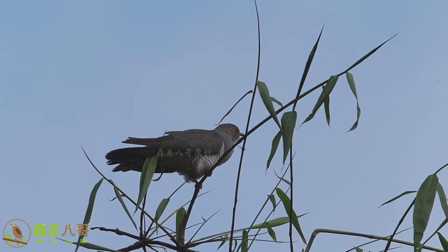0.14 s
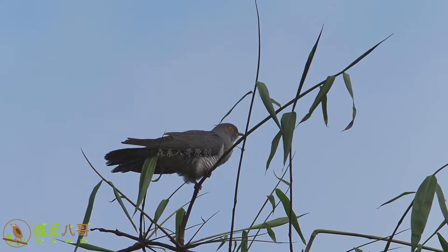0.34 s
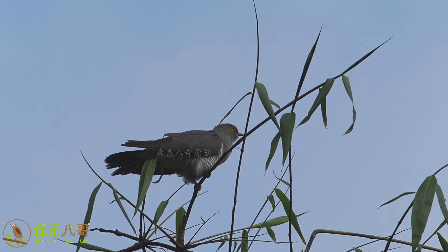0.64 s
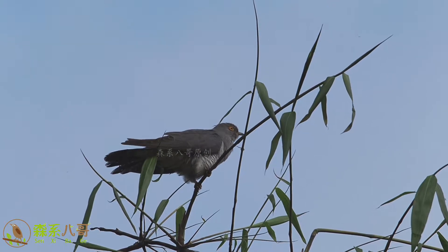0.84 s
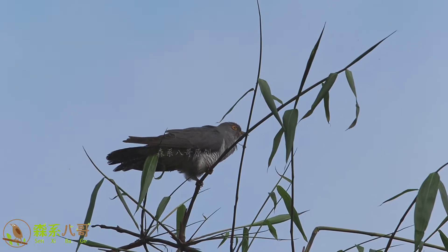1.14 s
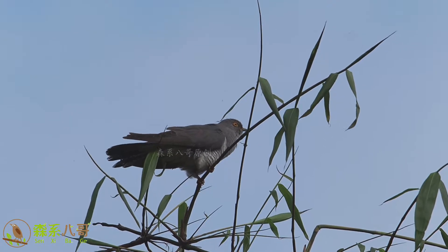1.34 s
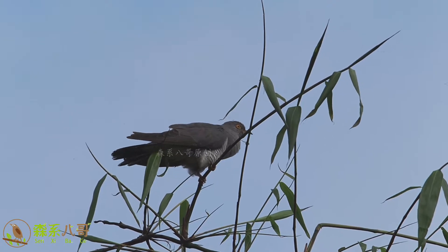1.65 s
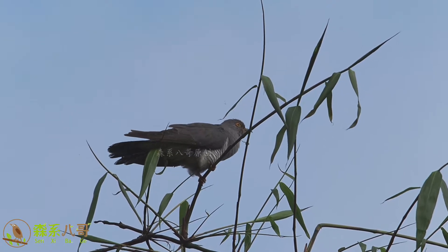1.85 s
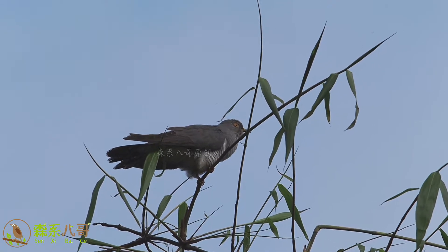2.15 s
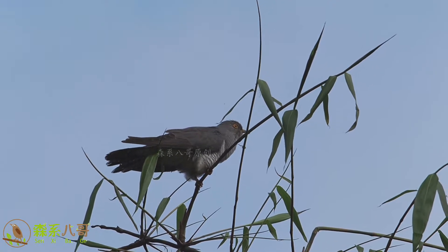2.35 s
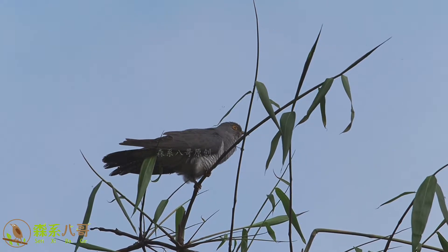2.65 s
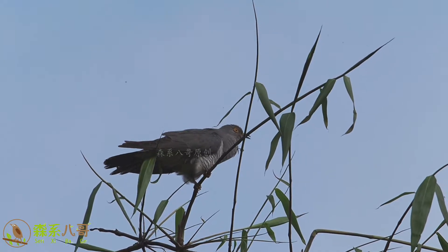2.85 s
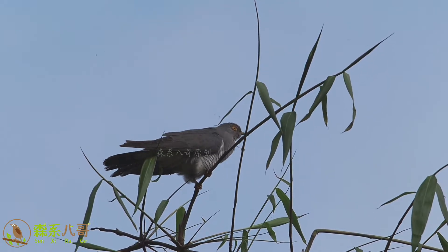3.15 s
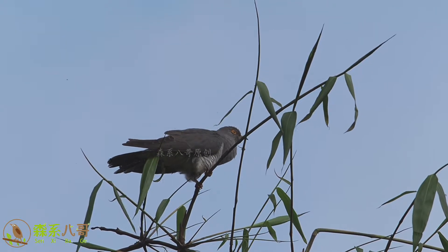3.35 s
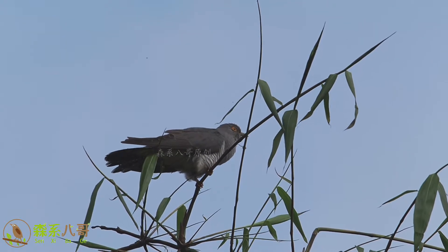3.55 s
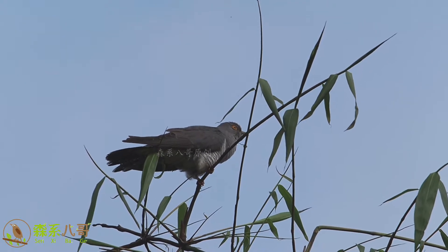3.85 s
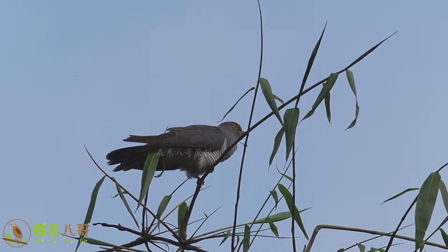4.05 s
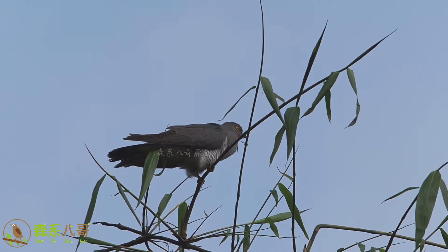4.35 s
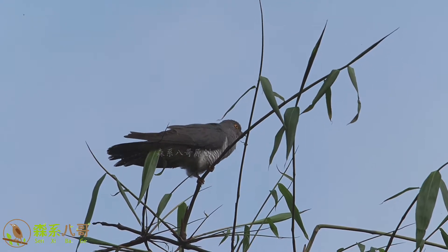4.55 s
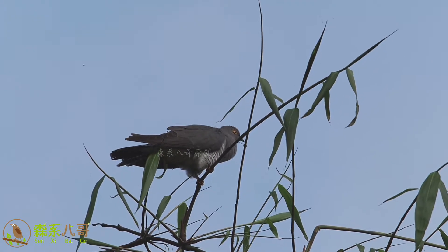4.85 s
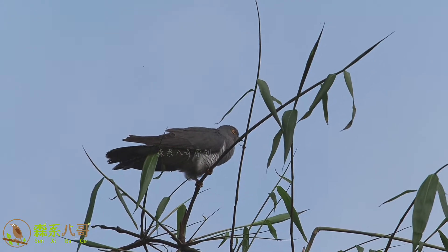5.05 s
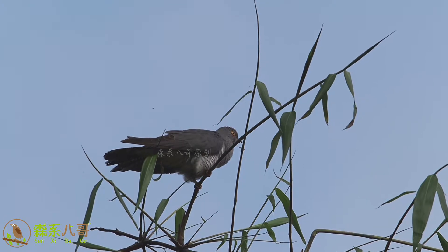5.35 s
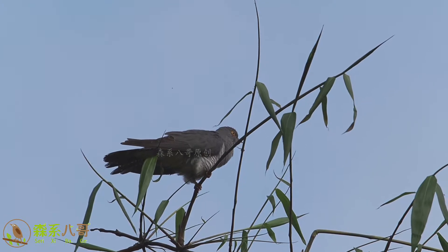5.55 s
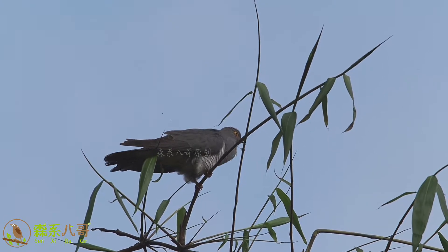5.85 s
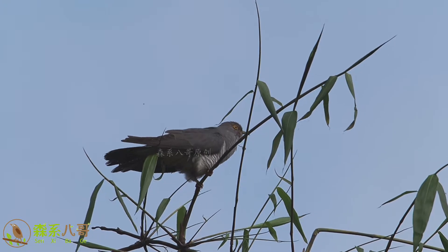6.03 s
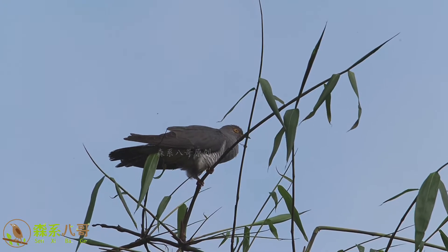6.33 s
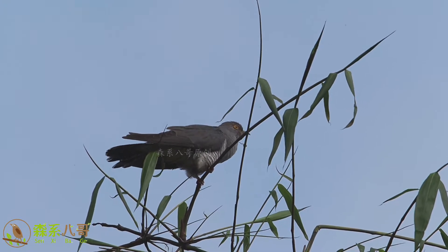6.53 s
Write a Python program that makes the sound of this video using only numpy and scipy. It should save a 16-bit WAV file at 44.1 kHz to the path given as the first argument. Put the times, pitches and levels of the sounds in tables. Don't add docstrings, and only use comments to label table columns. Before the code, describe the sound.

A cuckoo calls its mellow two-note song four times, echoing off trees, while small birds twitter, whistle and trill faintly over a soft outdoor hush.

```python
import sys
import numpy as np
from scipy import signal
from scipy.fft import rfft, irfft, next_fast_len
from scipy.io import wavfile

SR = 44100
rng = np.random.default_rng(int(sys.argv[2]) if len(sys.argv) > 2 else 0)


def to_wav(sig):
    pcm = np.clip(np.atleast_2d(sig), -1, 1) * 32767
    pcm = np.round(pcm).astype(np.int16)
    wavfile.write(sys.argv[1], SR, pcm.T)


def ratio_of_db(decibels):
    return 10 ** (np.asarray(decibels, float) / 20)


N = 295029
TIME = np.arange(N) / SR
CALL_TIME = np.arange(N + SR) / SR - 1


def at_hz(points, hz):
    points_hz, points_db = np.transpose(points)
    return np.interp(np.log(hz), np.log(points_hz), points_db)


def drift(rate_hz):
    return np.interp(TIME * rate_hz, np.arange(400), rng.standard_normal(400))


def gate(rows, edge_s):
    total = np.zeros(N)
    for row in rows:
        to_nearest_end = np.minimum(TIME - row[0], row[0] + row[1] - TIME)
        total += ratio_of_db(row[-1]) * np.clip(to_nearest_end / edge_s, 0, 1)
    return total


def correlated_pair(mid, side, alike):
    alike = np.clip(alike, -1, 1)
    return np.sqrt(1 + alike) * mid + np.sqrt(1 - alike) * side * [[1], [-1]]


def scatter(x, t60_s, wet_db, onset_s, alike):
    t = np.arange(3 * SR // 2) / SR
    mid, side = rng.standard_normal((2, len(t)))
    buildup = np.clip(t / onset_s, 0, 1) ** 2
    tail = correlated_pair(mid, side, alike) * ratio_of_db(-60 * t / t60_s) * buildup
    tail = tail / np.sqrt(np.mean(np.sum(tail ** 2, axis=1)))
    return ratio_of_db(wet_db) * signal.fftconvolve(x[None], tail, axes=1)[:, :len(x)]


def from_side(x, pan_db):
    return np.array([np.roll(x, 6) * ratio_of_db(pan_db / 2), x * ratio_of_db(-pan_db / 2)])


def glides(rows, early, rise, sharp, octave_db, waver_db):
    out = np.zeros(N)
    unsteady = ratio_of_db(waver_db * drift(25))
    wobble = 1 + 0.006 * drift(55)
    for start_s, length_s, from_hz, to_hz, level_db in rows:
        on = (TIME >= start_s) & (TIME < start_s + length_s)
        u = (TIME[on] - start_s) / length_s
        hz = from_hz + (to_hz - from_hz) * (u + (4 * early - 2) * u * (1 - u))
        phase = 2 * np.pi * np.cumsum(hz * wobble[on]) / SR
        swell = np.minimum(u / rise, (1 - u) / (1 - rise)) ** sharp
        tone = np.sin(phase) + ratio_of_db(octave_db) * swell * np.sin(2 * phase)
        out[on] += ratio_of_db(level_db + 8) * swell * tone
    return out * unsteady


def air_floor(patchy_db):
    # hz, level_db (per Hz)
    floor_spectrum = [(12, -23), (22, 4.5), (282, -9), (958, -8.5), (1270, -13.5), (2680, -20),
                      (8180, -24.5), (15500, -33.5)]
    # centre_hz, width_hz, level_db
    dips_and_insects = [(250, 24.5, 5), (351.4, 25, -10), (580, 62, -8), (3224, 294, 11), (6440, 570, -6)]
    # hz, likeness (-1 to 1)
    likeness = [(40, 0.69), (130, 0.3), (640, 0.45), (1400, .3), (3100, -0.33), (4500, -0.25),
                (7000, -0.16), (15000, 0.0087)]
    # hz, left_minus_right_db
    leaning = [(60, 1.3), (200, 2), (500, 0), (1290, -1), (2400, 1.5), (8000, 0.9), (15000, -2.5)]
    size = next_fast_len(N)
    hz = np.maximum(np.arange(size // 2 + 1) * SR / size, 1)
    mid, side = rfft(rng.standard_normal((2, size)))
    alike = np.clip(at_hz(likeness, hz), -1, 1)
    level_db = at_hz(floor_spectrum, hz) + at_hz(leaning, hz) * [[.5], [-.5]]
    for centre_hz, width_hz, band_db in dips_and_insects:
        level_db = level_db + band_db * np.exp(-((hz - centre_hz) / width_hz) ** 2)
    pair = correlated_pair(mid, side, alike) * ratio_of_db(level_db) / np.sqrt(1 + alike)
    octave = np.log2(hz / 16)
    together = drift(0.74)
    out = 0
    for centre in range(11):
        share = np.cos(np.pi / 2 * np.clip(octave - centre, -1, 1)) ** 2
        swell = ratio_of_db(patchy_db * (0.37 * together + drift(4)))
        out = out + swell * irfft(pair * share, size)[:, :N]
    return ratio_of_db(-55.5) * out / np.sqrt(np.mean(out.mean(axis=0) ** 2))


def flock(bouts, low_hz, high_hz, trim_db):
    out = np.zeros(N + 1000)
    u = np.arange(1000) / 1000
    for when, pitch, slide, loudness in rng.random((1000, 4)):
        hz = low_hz + (high_hz - low_hz) * pitch + 1500 * (slide - .6) * (u - .5)
        at = int(when * N)
        chirp = np.sin(np.pi * u) ** 2 * np.sin(2 * np.pi * np.cumsum(hz) / SR)
        out[at:at + 1000] += ratio_of_db(8 * loudness) * chirp
    return ratio_of_db(trim_db) * gate(bouts, edge_s=0.14) * out[:N] / out.std()


def far_flocks():
    # start_s, length_s, level_db
    low_bouts = [
        (-.1, 0.66, -62),
        (.6, 0.24, -63),
        (1.3, 1.3, -64),
        (2.7, 1.17, -63),
        (4.68, 0.35, -57.5),
        (0, 4, -65.5),
    ]
    # start_s, length_s, level_db
    high_bouts = [
        (0.2, 0.82, -60.5),
        (0.8, 0.35, -55.5),
        (1.8, .7, -64.5),
        (3.15, 0.66, -62),
        (0, 3.75, -61),
    ]
    low = flock(low_bouts, low_hz=3900, high_hz=5454, trim_db=-5.5)
    return low + flock(high_bouts, low_hz=5390, high_hz=7100, trim_db=-10)


def far_coos():
    # start_s, length_s, from_hz, to_hz, level_db
    coos = [(.005, 0.1, 2500, 2450, -69), (.58, 0.06, 2150, 2130, -70), (.7, .13, 1310, 1290, -71),
            (.7, 0.06, 950, 1060, -67), (.8, 0.14, 910, 890, -66), (.84, 0.069, 1950, 1750, -67),
            (1.03, 0.14, 740, 736, -67), (1.26, 0.07, 2030, 2060, -63), (1.41, .04, 1740, 1700, -65),
            (2.1, .15, 1340, 1320, -69), (2.35, 0.3, 1290, 1314, -73), (3.92, 0.12, 1100, 950, -60),
            (4.8, 0.12, 1700, 2050, -65), (5.72, 0.079, 1000, 1015, -64)]
    return glides(coos, early=0.7, rise=0.25, sharp=0.4, octave_db=-40, waver_db=3)


def whistles():
    # start_s, length_s, from_hz, to_hz, level_db
    whistled = [(.06, .13, 7600, 7600, -74), (.04, .07, 5900, 4900, -70), (.12, .34, 4640, 4600, -75),
                (1.25, 1.05, 7350, 7350, -78), (2.1, .18, 4420, 4330, -66), (2.43, .08, 4600, 5800, -69),
                (2.5, .3, 7100, 7300, -77), (2.78, .3, 5000, 5400, -73), (3.61, .08, 4300, 4300, -69),
                (3.79, .08, 4450, 4400, -72), (4.94, .37, 4550, 4950, -64.5), (5.33, .17, 4170, 4200, -63),
                (5.53, .12, 4750, 4250, -64), (5.72, .3, 7900, 7480, -68), (5.85, .27, 7100, 7000, -81),
                (5.96, .08, 4200, 4200, -72)]
    return glides(whistled, early=0.88, rise=0.4, sharp=0.4, octave_db=-49.5, waver_db=1.8)


def long_note():
    # start_s, length_s, pitch_hz, level_db (rms)
    phrases = [
        (3.45, .24, 3235, -62),
        (3.76, .5, 3185, -59),
        (4.27, .24, 3190, -63),
        (4.49, .24, 3195, -57.5),
        (4.75, .23, 3180, -57.5),
        (4.97, .43, 3190, -65),
    ]
    start_s, length_s, pitch_hz, _ = np.transpose(phrases)
    hz = np.interp(TIME, start_s + length_s / 2, pitch_hz) + 14 * drift(55)
    phase = 2 * np.pi * np.cumsum(hz) / SR
    return gate(phrases, edge_s=0.019) * ratio_of_db(7.5 + 1.2 * drift(35)) * np.sin(phase)


def trills():
    # start_s, length_s, top_hz, drop_hz, level_db
    buzzes = [
        (0.444, 0.057, 7220, 586, -53.5),
        (0.513, 0.43, 7100, 1280, -63),
        (1.479, 0.34, 6990, 1424, -57),
        (1.872, 0.53, 6895, 1170, -74),
        (2.952, .1, 8440, 883, -66),
        (3.01, 0.061, 7726, 805, -54),
        (3.12, 0.048, 7650, 1014, -56),
        (4.75, 0.22, 5600, 2210, -57),
    ]
    run = [(3.6 + 0.1 * k, 0.034, 7000 - 39.3 * k, 646, -62 - 3 * k) for k in range(5)]
    sweeps = np.cumsum(44 * (1 + 0.1 * drift(30))) / SR
    out = np.zeros(N)
    for start_s, length_s, top_hz, drop_hz, level_db in [*buzzes, *run]:
        on = (TIME >= start_s) & (TIME < start_s + length_s)
        u = TIME[on] - start_s
        within = (sweeps[on] - sweeps[on][0]) % 1
        phase = 2 * np.pi * np.cumsum(top_hz - drop_hz * within ** 2.2) / SR
        envelope = np.sin(np.pi * within) ** 0.17 * np.sin(np.pi * u / length_s) ** 0.24
        out[on] += ratio_of_db(level_db - 2.5) * envelope * np.sin(phase)
    return out * ratio_of_db(2 * drift(14))


def near_sweeps():
    # start_s, length_s, from_hz, to_hz, level_db
    rising = [
        (5.455, 0.082, 3800, 4950, -43.5),
        (5.785, 0.04, 3950, 4550, -53),
        (6.285, 0.028, 4850, 5600, -58),
        (6.29, .122, 2700, 4850, -41),
    ]
    return glides(rising, early=0.42, rise=0.9, sharp=1.35, octave_db=-22, waver_db=1)


def twigs():
    # start_s, level_db (peak)
    snaps = [
        (2.6, -58),
        (4.865, -52),
        (6.42, -54),
    ]
    out = np.zeros(N)
    decay = np.exp(-np.arange(400) / SR / .002)
    for start_s, level_db in snaps:
        at = round(start_s * SR)
        out[at:at + 400] += ratio_of_db(level_db - 6) * rng.standard_normal(400) * decay
    return signal.sosfilt(signal.butter(2, [2500, 6500], "band", fs=SR, output="sos"), out)


def breath_noise():
    # hz, level_db (per Hz)
    breath_spectrum = [(330, -40), (500, -12), (600, 6), (800, -12), (1200, -15), (4000, -32), (9000, -33),
                       (13000, -48)]
    size = next_fast_len(N + SR)
    hz = np.arange(1, size // 2 + 2) * SR / size
    spectrum = rfft(rng.standard_normal(size)) * ratio_of_db(at_hz(breath_spectrum, hz))
    breath = irfft(spectrum, size)[:N + SR]
    return breath / breath.std()


def overtone_series(pitch, orders):
    # multiple (of pitch), centre_hz, width_hz, level_db
    beak = [(7, 4900, 60, -36), (15, 10300, 150, -36)]
    phase = 2 * np.pi * np.cumsum(pitch) / SR
    out = sum(ratio_of_db(db) * np.sin(multiple * phase) for multiple, db in orders)
    for multiple, centre_hz, width_hz, db in beak:
        resonance = np.exp(-((multiple * pitch - centre_hz) / width_hz) ** 2)
        out = out + ratio_of_db(db) * resonance * np.sin(multiple * phase)
    return out


def cuckoo_voice():
    # start_s, wait_s (to the low note), high_hz, low_hz, fade_db_per_s (extra, on the high note)
    calls = [
        (1.232, 0.34, 708.4, 554.6, 55),
        (2.893, 0.34, 709, 560.4, 5),
        (4.413, .349, 712.8, 561.7, 0),
        (5.905, 0.35, 715.8, 561, -54),
    ]
    # after_s (its start), pitch_hz, level_db (peak)
    high_note = [(0, 503, -60), (.014, 542, -53), (.028, 607, -39.5), (.042, 693.5, -26),
                 (.065, 693.2, -26.5), (.1, 713, -26), (.135, 643, -41), (.18, 752, -50)]
    low_note = [(0.012, 503, -63), (.022, 530.4, -46.5), (.031, 530, -33), (.045, 550.6, -34),
                (.08, 558.3, -36), (.13, 563.2, -40), (0.182, 559, -48), (.225, 526.2, -44.5),
                (.26, 567, -57)]
    # after_s (the note's start), pitch_hz, level_db
    high_shape = [(.008, 465.7, -60), (.024, 593, -26), (.045, 673, -30.5), (.1, 719, -28),
                  (.15, 710, -28.5), (.21, 690, -36.5), (.23, 668.5, -71)]
    low_shape = [(0, 484, -43.5), (.03, 547.4, -43), (.1, 551.4, -41.5), (0.2, 560.8, -37),
                 (.235, 548, -38.5), (0.259, 570, -68)]
    # multiple (of pitch), level_db (re fundamental)
    high_orders = [(2, -22.5), (3, -46.5)]
    low_orders = [(.5, -31), (1.5, -25), (2, -19), (2.5, -30.5), (3, -25), (4, -31.5)]
    fundamental, effort, overtones = np.zeros((3, N + SR))
    earlier = np.array(calls[0]) - [1.98, 0, 0, 0, 0]
    notes = []
    for start_s, wait_s, high_hz, low_hz, fade in [earlier, *calls]:
        notes.append((start_s, high_hz / 713, fade, high_note, high_shape, high_orders))
        notes.append((start_s + wait_s, low_hz / 561, 0, low_note, low_shape, low_orders))
    for start_s, scale, fade, note, shape, orders in notes:
        after, hz, db = np.transpose(note)
        db = db + fade * np.maximum(after - 0.065, 0)
        on = (CALL_TIME >= start_s) & (CALL_TIME <= start_s + after[-1])
        t = CALL_TIME[on] - start_s
        phase = 2 * np.pi * np.cumsum(np.interp(t, after, hz * scale)) / SR
        envelope = np.interp(t, after, ratio_of_db(db) * (after < after[-1]))
        fundamental[on] += envelope * np.sin(phase)

        after, hz, db = np.transpose(shape)
        on = (CALL_TIME >= start_s) & (CALL_TIME <= start_s + after[-1])
        t = CALL_TIME[on] - start_s
        effort[on] = np.interp(t, after, ratio_of_db(db))
        overtones[on] = overtone_series(np.interp(t, after, hz * scale), orders)
    waver = ratio_of_db(4 * np.pad(drift(50), (SR, 0)))
    return fundamental, effort * (waver * overtones + ratio_of_db(-21.5) * breath_noise())


def echo_paths():
    # delay_ms, gain (signed)
    left_echoes = [(0.0, 1.13), (2.0, 0.47), (3.9, 0.026), (13.4, -0.54), (16.1, -0.17), (31.7, 0.056),
                   (40.1, -0.42), (48.8, 0.48), (50.6, -0.35), (58.7, 0.63), (65.5, 0.12), (100.0, 0.42),
                   (132.4, 0.26), (177.1, -0.23)]
    right_echoes = [(0.0, 1), (2.7, -0.32), (6.1, 0.14), (10.2, -0.49), (17.7, -0.5), (23.8, -0.098),
                    (27.9, 0.22), (39.5, 0.12), (53.7, -0.69), (59.9, -0.39), (64.4, 0.29), (105.4, 0.15),
                    (141.3, 0.25), (183.4, 0.14)]
    paths = np.zeros((2, SR // 2))
    for channel, echoes in enumerate((left_echoes, right_echoes)):
        for delay_ms, gain in echoes:
            paths[channel, round(delay_ms * SR / 1000)] = gain
    return paths


def cuckoo():
    fundamental, overtones = cuckoo_voice()
    echoed = 0.45
    voice = fundamental + echoed * overtones
    heard = signal.fftconvolve(voice[None], echo_paths(), axes=1)[:, :N + SR]
    heard = heard + (1 - echoed) * overtones
    wood = scatter(voice, t60_s=1.4, wet_db=-12.5, onset_s=0.13, alike=0.89)
    return (heard + wood)[:, SR:]


def scene():
    buzz = trills() + far_flocks()
    low = far_coos()
    far = whistles() + long_note()
    near = near_sweeps() + twigs()
    birds = 0.51 * from_side(buzz, pan_db=11) + scatter(buzz, t60_s=0.6, wet_db=-1.7, onset_s=0.016, alike=0)
    birds += 0.35 * low + scatter(low, t60_s=0.5, wet_db=-3, onset_s=0.013, alike=0.6)
    birds += from_side(far, pan_db=6.5) + scatter(far, t60_s=0.29, wet_db=-3.5, onset_s=0.021, alike=-0.11)
    birds += from_side(near, pan_db=-1) + scatter(near, t60_s=0.6, wet_db=-5, onset_s=0.015, alike=-0.19)
    return air_floor(patchy_db=0.7) + birds + cuckoo()


def low_pass(x):
    return signal.sosfilt(signal.butter(12, 15660, fs=SR, output="sos"), x)


def record(dry):
    return low_pass(dry)


dry = scene()
out = record(dry)
to_wav(out)
```